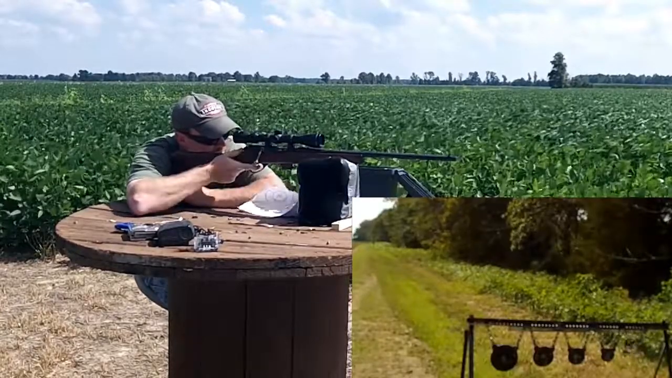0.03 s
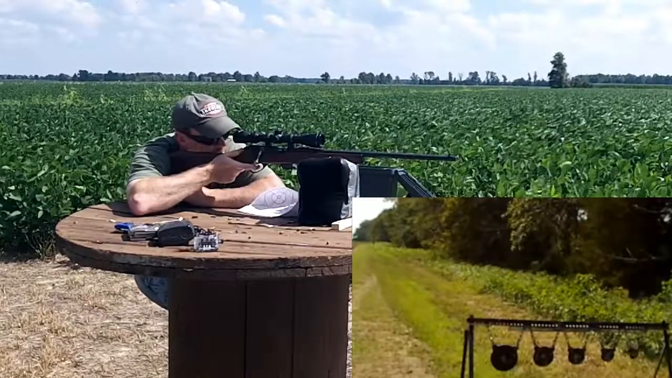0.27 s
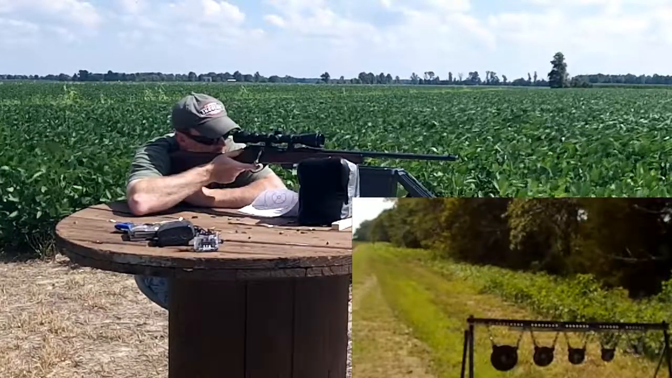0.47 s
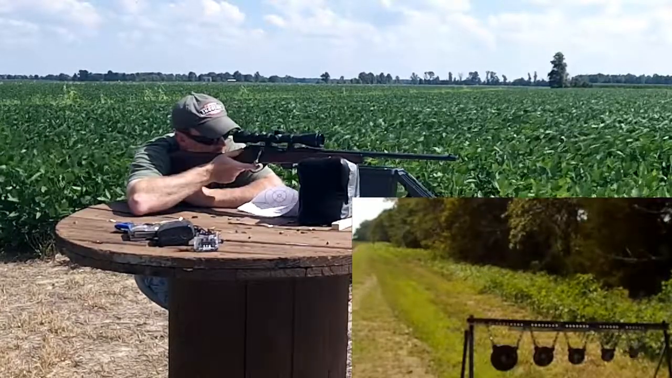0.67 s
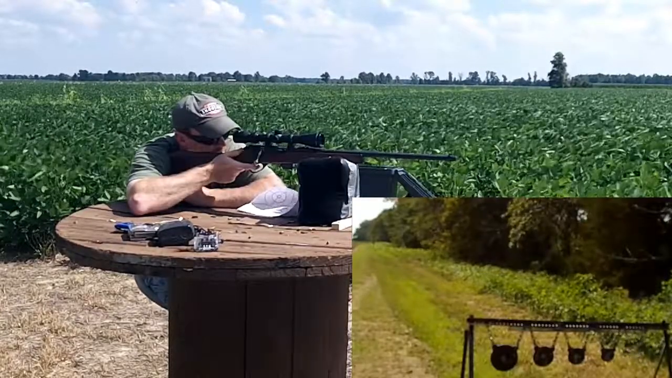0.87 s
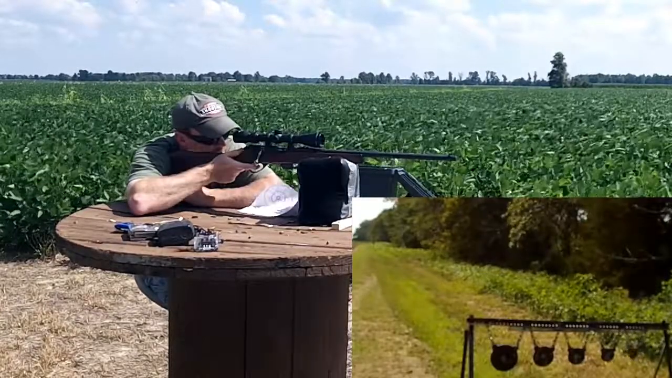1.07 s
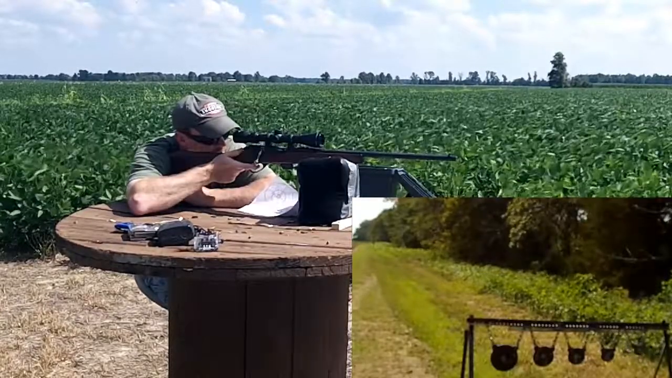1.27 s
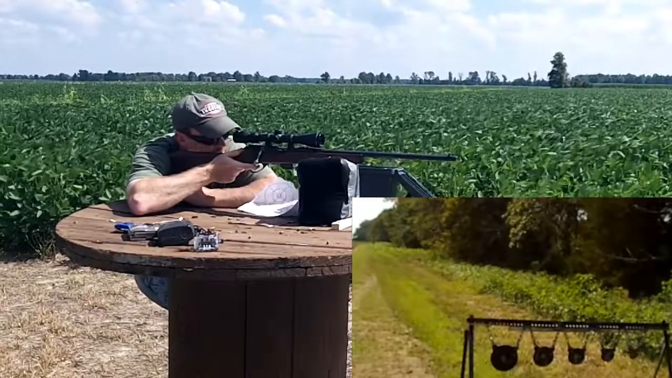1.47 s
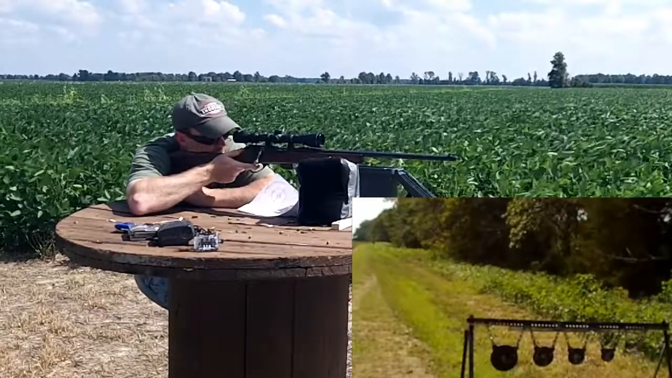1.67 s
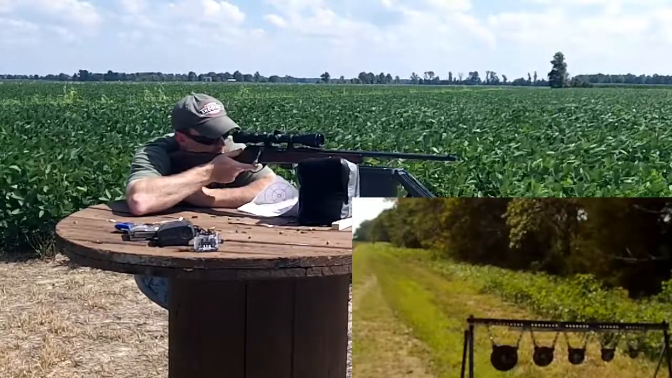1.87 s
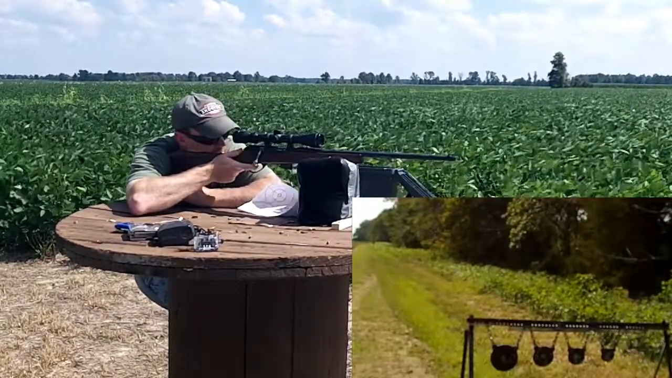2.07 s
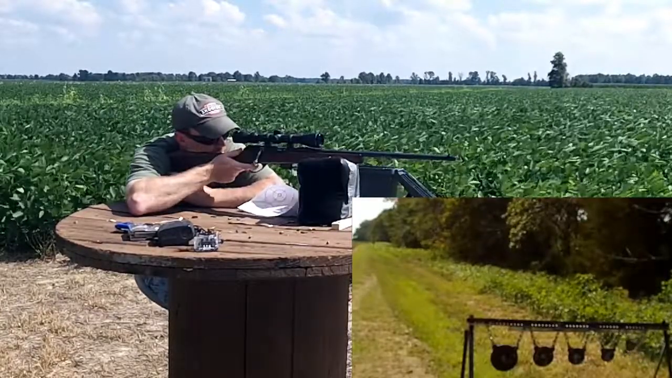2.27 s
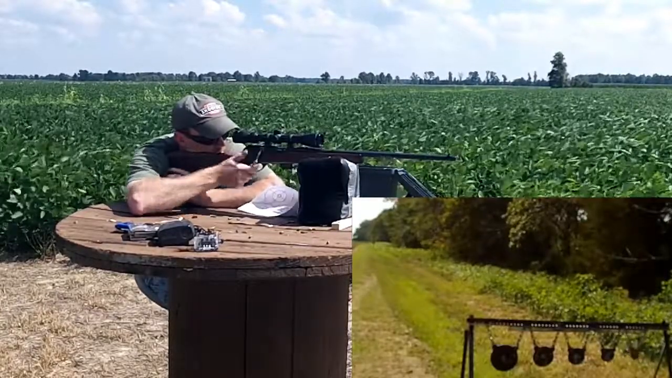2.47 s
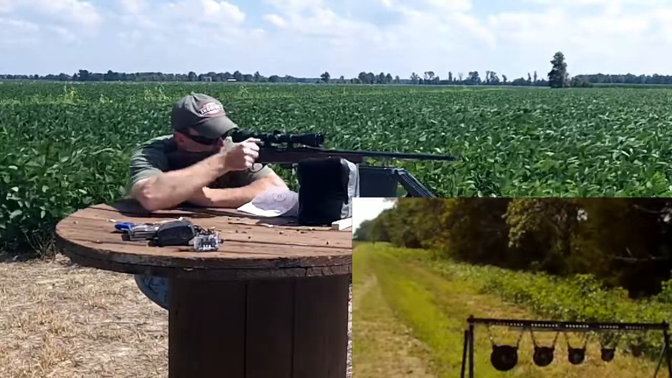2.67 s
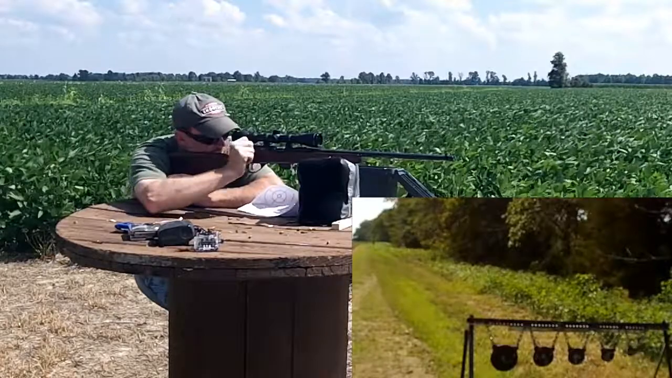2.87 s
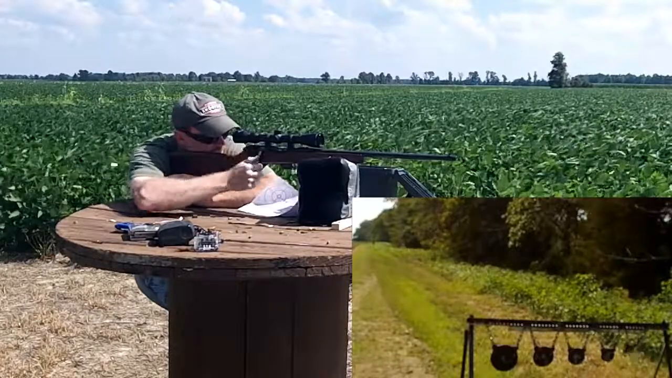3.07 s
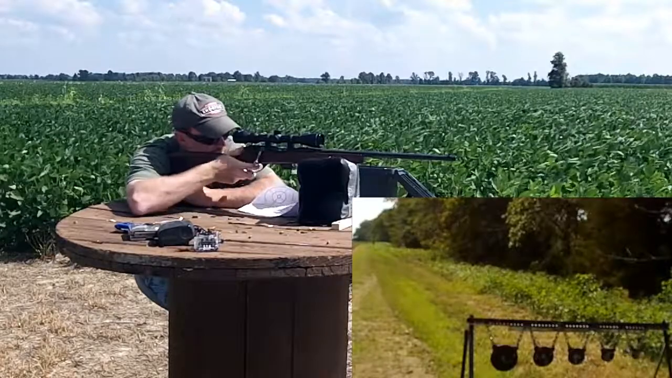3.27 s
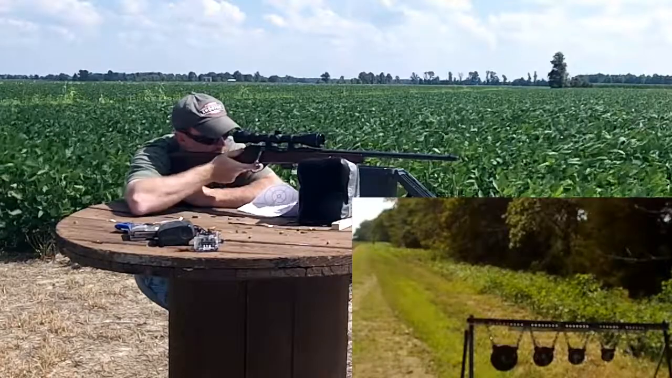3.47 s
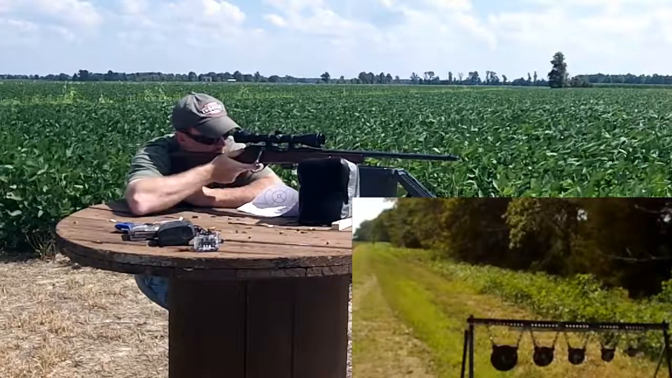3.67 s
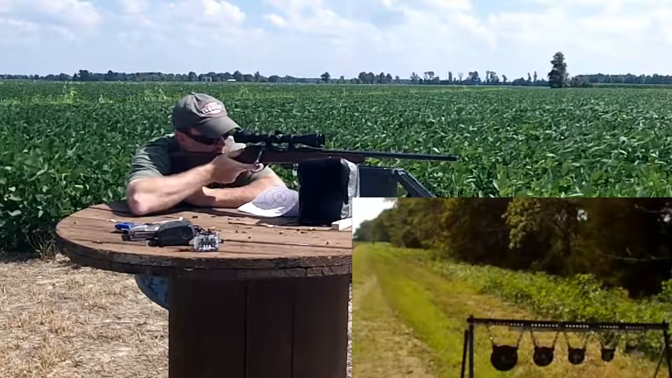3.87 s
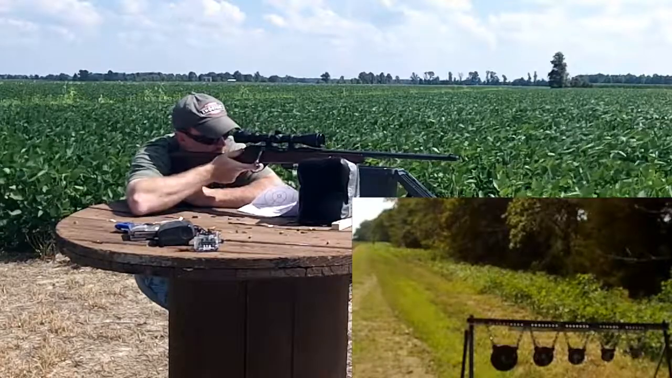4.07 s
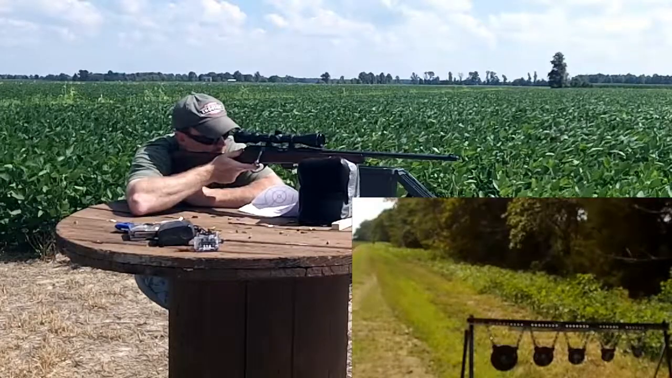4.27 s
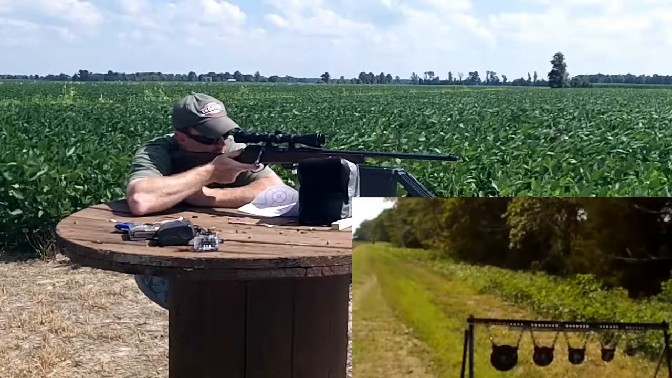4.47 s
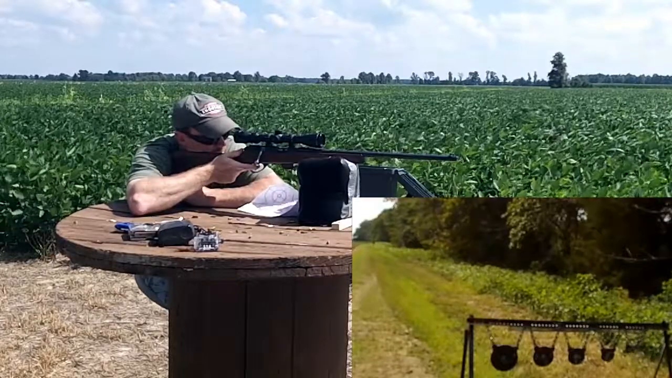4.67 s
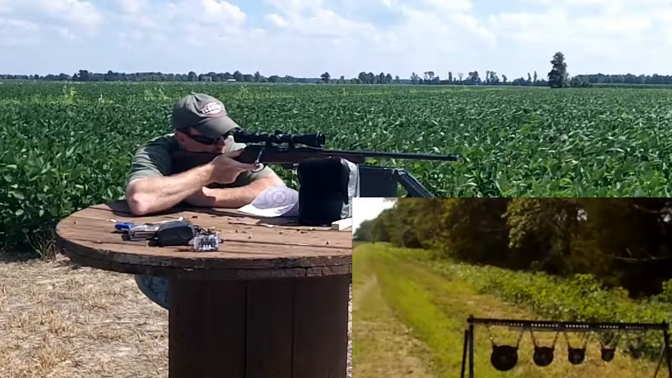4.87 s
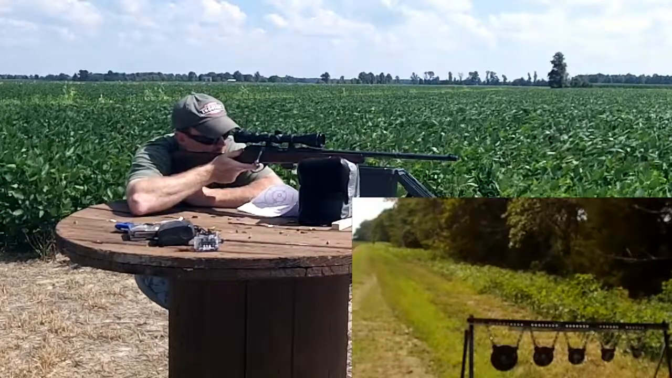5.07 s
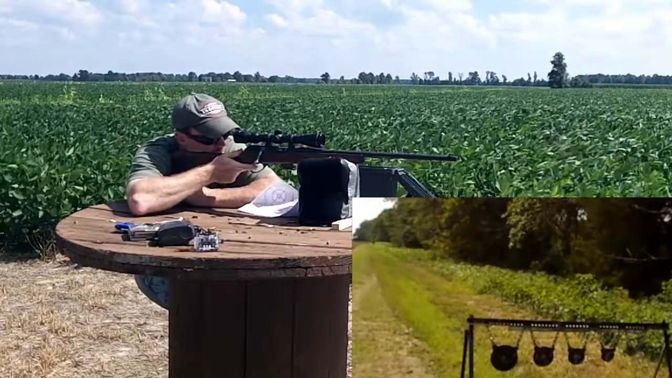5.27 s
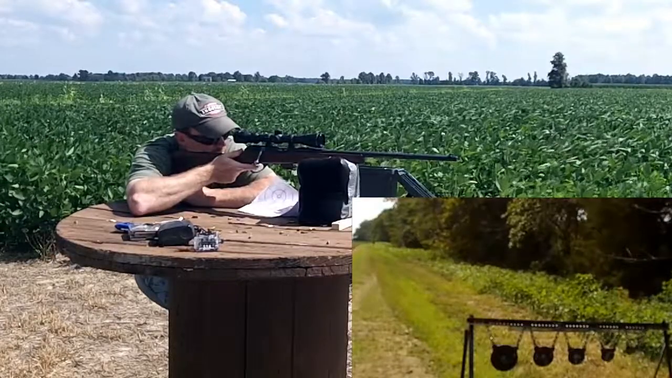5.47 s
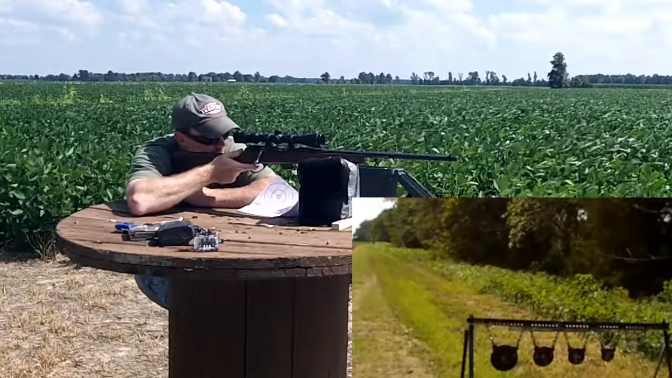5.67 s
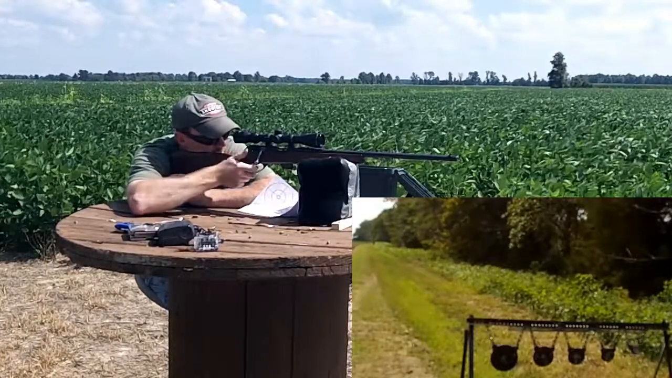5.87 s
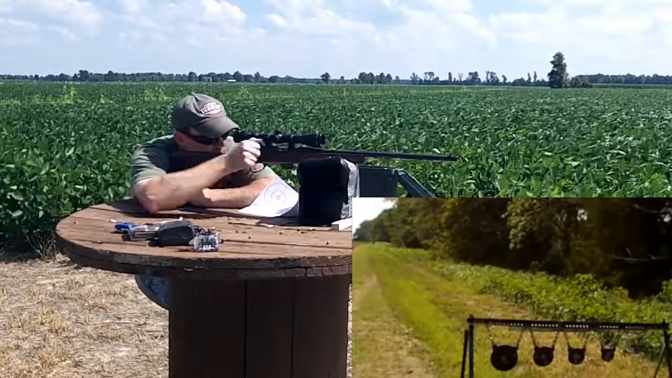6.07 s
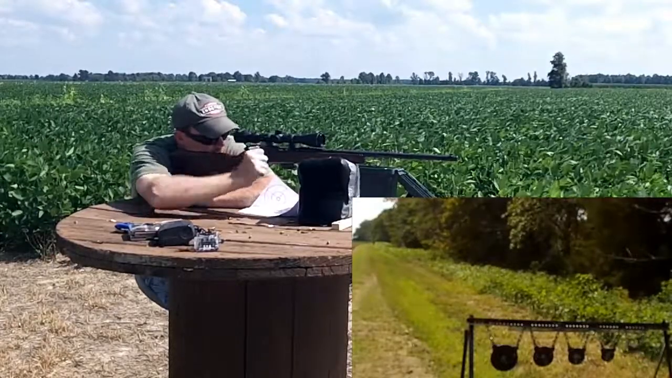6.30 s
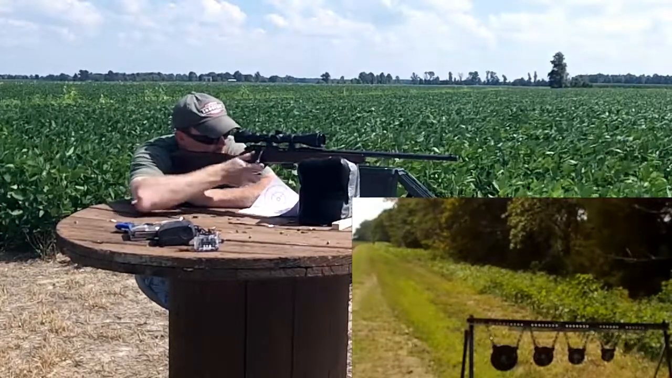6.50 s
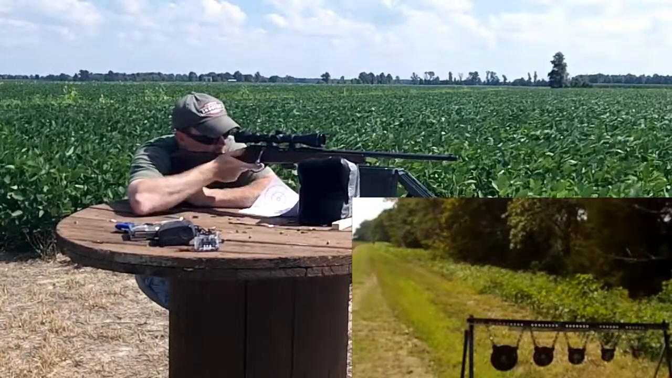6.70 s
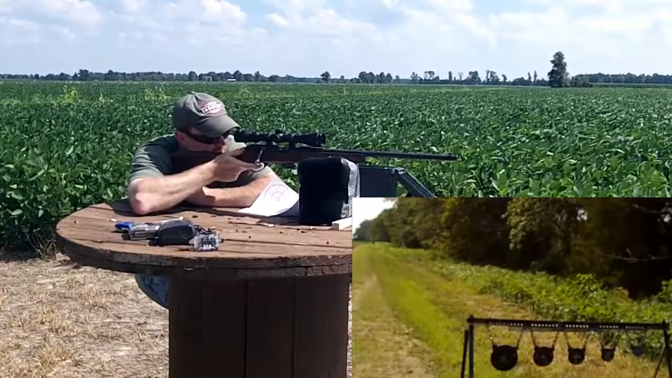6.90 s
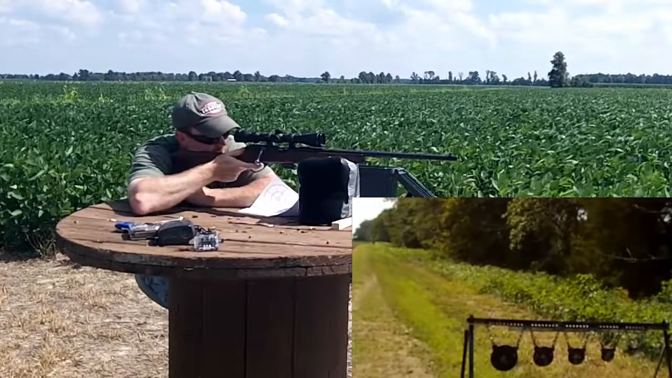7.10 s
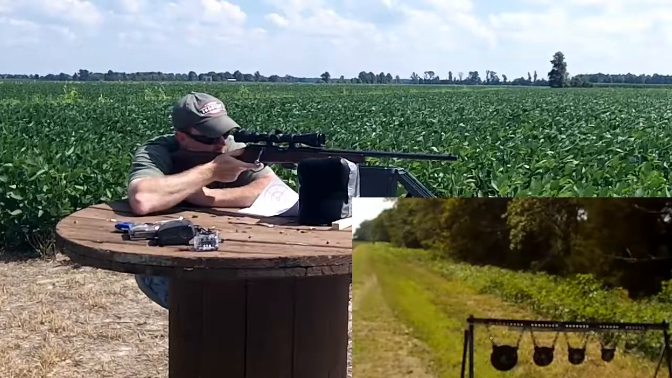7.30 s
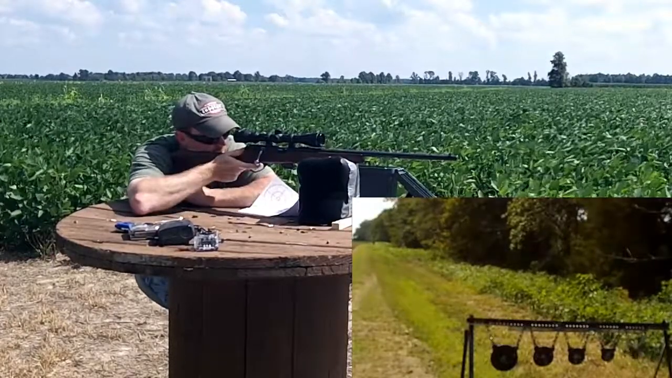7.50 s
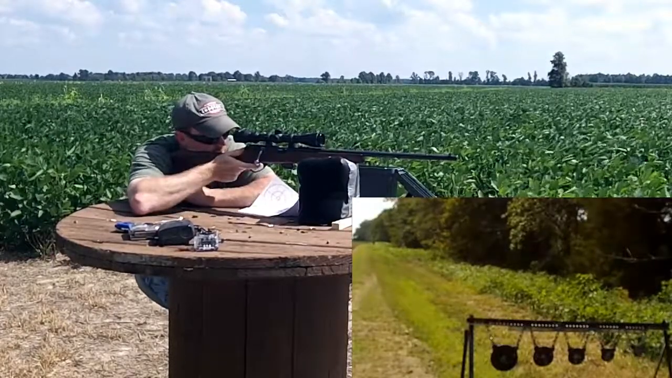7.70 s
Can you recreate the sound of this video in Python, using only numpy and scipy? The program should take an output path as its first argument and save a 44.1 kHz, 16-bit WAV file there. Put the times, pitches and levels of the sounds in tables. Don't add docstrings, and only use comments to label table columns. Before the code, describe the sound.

Two sharp rifle shots crack over open farmland, each echoing off trees and followed by loud metallic bolt clacks, with wind rumbling on the microphone.

```python
import sys
import numpy as np
from scipy import signal
from scipy.fft import rfft, irfft, next_fast_len
from scipy.io import wavfile
from scipy.ndimage import map_coordinates

SR = 44100
rng = np.random.default_rng(int(sys.argv[2]) if len(sys.argv) > 2 else 0)


def level_to_linear(level):
    exponent = np.asarray(level, float) / 20
    return 10 ** exponent


def inscribe(sig):
    pcm = np.round(np.clip(np.atleast_2d(sig).T, -1, 1) * 32767)
    wavfile.write(sys.argv[1], SR, pcm.astype(np.int16))


N = 341412
TIME = np.arange(N) / SR

# start in seconds, level in dB.
SHOTS = [
    (1.8393, -0.3),
    (5.3694, -1.3),
]
# delay in seconds, boom in dB, crack in dB, decay time t60 in seconds.
BLAST_ARRIVALS = [
    (0.0001, 1, -12.5, .02),
    (.0017, -1, -11.5, .012),
    (.0032, -0.5, 2, 0.012),
    (.027, -9, -32, .1),
    (.2468, -42, -6, .005),
]
# delay in seconds, boom of the first shot in dB,
# boom of the second shot in dB, crack in dB.
ECHOES = [(.0068, -5.5, -13.5, -16), (.0078, -10, -11, -24.5), (0.0102, -10, -7, -19),
          (.016, -14.5, -10, -25), (0.0231, -4, -3, -28), (.027, -10.5, -12, -31),
          (0.0299, -16.5, -5, -30.5), (0.0311, -5.5, -8, -34), (.035, 1, 1.5, -24.5),
          (.038, -1.5, -11, -25.5), (0.0407, -4.5, -6, -29), (0.043, -10.5, -10, -33.5),
          (0.05, -6, -8, -20.5), (0.055, -20, -18, -24.5), (0.0567, -24, -17, -26), (.065, -24, -29, -40),
          (.069, -7, -18, -23), (0.0778, -12, -21, -28), (0.083, -14, -12, -33), (0.097, -20, -27, -30),
          (0.1009, -10, -24, -19), (0.1185, -13, -11.5, -31), (.128, -16, -17, -28),
          (.136, -11.5, -28, -26), (0.141, -14, -26, -26), (0.146, -19, -30, -17), (.162, -17, -19, -27),
          (.192, -10.5, -10, -40), (0.199, -3.5, -7, -33), (0.214, -22, -24, -37), (.2265, -14, -12, -32),
          (.234, -32, -19, -29.5), (.245, -19.5, -16, -25), (.308, -31, -27, -29), (.319, -14, -22, -10),
          (0.3224, -7, -6.5, -12.5), (0.339, -19, -20, -23), (0.3424, -15.5, -20, -17),
          (0.4828, -28, -16.5, -29), (0.5005, -8, -6, -18), (.508, -16, -13, -35), (.523, -23, -27, -26),
          (0.62, -19.5, -17.5, -44), (.682, -24.5, -18, -48), (.732, -27, -30, -50)]
ECHO_T60_S = 0.007
# delay in seconds, boom in dB, crack in dB, decay time t60 in seconds.
TREE_SWELLS = [
    (.0033, -12, -19, .25),
    (.299, -28, -15, 0.33),
    (.46, -46.5, -16.5, 0.25),
    (.485, -15.5, -44, 0.23),
    (.672, -22.5, -48, 0.27),
    (.523, -40, -20, 0.11),
    (.31, -23, -23, 0.39),
]
# delay in seconds, boom in dB, crack in dB.
FIELD_SCATTER = [(.01, -53.5, -47), (.055, -25.5, -34.5), (.17, -30.5, -29.5), (.38, -38, -38),
                 (.57, -42, -35.5), (.67, -42, -45.5), (.76, -49, -52), (.85, -47, -61), (.91, -50, -58)]
# delay in seconds, start level in dB, decay time t60 in seconds.
SIZZLE_BURSTS = [
    (0.0002, -23, 0.023),
    (0.0048, -39.5, 0.14),
    (0.038, -36.5, 0.22),
    (0.0339, -24, 0.014),
]
# delay in seconds, peak in dB, decay time t60 in seconds.
PRESSURE_PUSHES = [
    (.0018, -13.5, 0.029),
    (.022, -33, 0.099),
    (.033, -27.5, .025),
]
# frequency in Hz, density in dB per Hz.
NEAR_BOOM_SPECTRUM = [(180, -54.5), (300, -31), (572, -24.5), (707, -16), (935, -12.5), (1060, -5),
                      (1210, 1.5), (1420, 4), (1900, -6.5), (2360, -19), (3000, -47.5), (3900, -80.5),
                      (6600, -120)]
FAR_BOOM_SPECTRUM = [(180, -43), (300, -15), (397, -15.5), (476, -8), (771, -1.5), (841, 3.5), (2550, -7),
                     (3000, -16.5), (3900, -38), (6600, -120)]
CRACK_SPECTRUM = [(290, -47), (500, -26), (1140, -8), (2530, -2.5), (3340, -4.5), (4300, -5.5),
                  (5290, -11.5), (6810, -22.5), (7880, -36.5), (9000, -30.5), (11700, -67), (19800, -120)]
LEAF_SPECTRUM = [(500, -41.5), (1140, -10), (2100, -1.5), (3100, -6.5), (4300, -2.5), (5400, -8),
                 (6900, -21.5), (7880, -35.5), (9000, -31.5), (11700, -66.5), (19800, -120)]
SIZZLE_SPECTRUM = [(4880, -43), (8300, -14.5), (9290, -4.5), (10700, -0.5), (11800, 2), (13000, -2),
                   (15100, -1), (16300, -21)]

# start in seconds, peak in dB,
# body in dB re peak, treble tilt in dB per octave, loudest ring in Hz.
FIRST_RELOAD = [(2.699, -21.5, -5, 7, 2770), (2.743, -16, -4, 1, 5000), (2.754, -5.5, -17, 10.5, 4800),
                (2.7616, -3.5, -10, 4, 4300), (2.8236, -26, -1.5, -7, 5000), (2.839, -26, 1, -3, 5000),
                (2.845, -23, -19, -1.5, 5000), (2.8498, -8, -25, 1.5, 4800), (2.8544, -9.5, -8, -1, 5000),
                (2.8589, -1.5, -12, 7.5, 5860), (2.8624, -20, -11, -5, 5130), (2.992, -12.5, -7, 4, 4870),
                (2.9999, -11, -19, 5, 5300), (3.0063, -4.5, -29, -5, 4300), (3.0197, -4.5, -37, -3, 4200),
                (3.0208, -7, -12, 0, 4760), (3.05, -27.5, -4, -3, 4600), (3.1, -9.5, -13.5, -9, 4460),
                (3.1, -5.5, -13, -2, 2770), (3.115, -33, -17, -3, 6300), (3.5361, -32.5, -10, 2, 4300)]
SECOND_RELOAD = [(6.0975, -27, 0, 7, 4500), (6.1001, -21.5, 4, 2, 4570), (6.143, -16.5, -9, -1, 4400),
                 (6.153, -6, -8, 1, 3200), (6.1637, -3.5, -8, 2, 4300), (6.2, -31, 2, -3, 5000),
                 (6.218, -24, 4, -3, 5000), (6.225, -16, -1, -1, 4750), (6.2302, -13, 0, 5, 4800),
                 (6.2345, -1.5, -16, 11, 3870), (6.331, -26.5, 1.5, -3, 4500), (6.344, -11, -9, 6, 4830),
                 (6.3517, -12, -15, 2, 4930), (6.3563, -7.5, -16, 2, 4400), (6.3645, -2, -12.5, 5, 4940),
                 (6.396, -23, -5, -16, 4700), (6.4537, -10, -6, 0, 4300)]
# start in seconds, peak in dB, body in dB re peak, decay time t60 in seconds,
# loudest ring in Hz.
REBOUNDS = [(2.6976, -21.5, 3.5, 0.015, 2800), (2.77, -31, -10, 0.065, 6300),
            (2.9947, -24, -7, 0.043, 4700), (3.01, -21, -9, 0.035, 5000), (3.025, -16, -9, 0.026, 4300),
            (6.229, -24, 9, 0.03, 4800), (6.3475, -15, -12, .05, 4800), (6.3677, -8, -20, 0.018, 5970),
            (6.916, -26.5, -27, 0.02, 4300), (6.9306, -37, 21, 0.0031, 4300), (6.897, -44, -9, .015, 4300)]
# frequency in Hz, width in Hz, level in dB.
STEEL_MODES = [(1990, 89, -11), (2750, 81, 2), (4300, 160, -7), (4930, 110, -4.5), (6000, 270, -4),
               (7050, 260, -1.5), (9070, 110, 3.5), (11500, 170, -4)]
# frequency in Hz, density in dB per Hz.
CLACK_SPECTRUM = [(880, -21.5), (1500, -7.5), (1870, -6.5), (2760, -2.5), (3400, -4.5), (4190, -1),
                  (5020, -1), (6130, -6.5), (7870, -19.5), (8870, -19.5), (11400, -25), (14300, -41.5),
                  (16300, -39.5)]
WOOD_SPECTRUM = [(150, -52), (400, -15), (1100, -10), (1800, 1.5), (2600, -10.5), (3800, -9.5), (6500, -67)]
CONTACT_T60_S, TREBLE_HZ = 0.015, 6260
LOUDEST_DB, LOUDEST_WIDTH_HZ = 4.5, 250

# centre in seconds, rumble in dB, flutter in dB re rumble, half length in seconds.
PUFFS = [(0.104, -36, -8, 0.075), (0.216, -37, -36, 0.21), (0.446, -33.5, -2, 0.078),
         (0.59, -35, -14, 0.056), (0.715, -33, -10.5, 0.049), (0.894, -30.5, -10.5, 0.081),
         (1.117, -29.5, -11.5, 0.094), (1.446, -35.5, -22, 0.051), (1.727, -37.5, -22, 0.073),
         (2.567, -40.5, -15, 0.034), (2.74, -36, -4.5, 0.082), (2.972, -35, -35, 0.048),
         (3.114, -57, 9.5, 0.03), (3.3, -35.5, -26, 0.081), (3.554, -36.5, -11, 0.046),
         (3.693, -33.5, -27, 0.043), (3.868, -36, -10, 0.081), (4.114, -40, -12, 0.14),
         (4.46, -45, -30, 0.099), (4.751, -39.5, -24, 0.11), (5.143, -38, -28, 0.12),
         (5.331, -35.5, -4.5, 0.049), (5.718, -28.5, -10.5, 0.098), (5.986, -28.5, -14, 0.031),
         (6.197, -28, 1, 0.16), (6.424, -17, -5, 0.024), (6.462, -29.5, 1.5, 0.092), (7.09, -38, 4, 0.11),
         (7.446, -37.5, -10.5, 0.047), (7.582, -36.5, -5, 0.021)]
LULL_DB, FLUTTER_DB = -50.5, -1.5
NARROWER = 1.7
SQUALL_S, SQUALL_HOLD_S, RISE_DB_PER_S, FALL_DB_PER_S = 6.6, 0.38, 600, 189
SQUALL_RUMBLE_DB, SQUALL_SWELL_DB, SQUALL_FLUTTER_DB = -28.5, 5, -21.5
# start in seconds, peak in dB, decay time t60 in seconds.
EDDY_POPS = [(6.214, -11.5, 0.055), (6.2, -15, .015), (6.407, -18, .01), (6.413, -11, 0.016),
             (6.434, -12.5, 0.025), (6.442, -13, 0.028), (6.548, -22, 0.025), (6.581, -27, .02),
             (6.604, -8.5, 0.037), (6.613, -11, 0.028), (6.625, -13, .03), (6.641, -14.5, .02),
             (6.69, -15, 0.013), (6.724, -17.5, 0.023), (6.754, -14, 0.015), (6.765, -12, 0.011),
             (6.78, -13, 0.027), (6.831, -15, 0.017), (6.844, -14.5, 0.017), (6.928, -5, 0.022),
             (6.955, -12, .02), (6.962, -5.5, 0.028), (6.984, -22, 0.016), (7.012, -21.5, 0.032)]
# start in seconds, peak in dB, brightness in dB.
EDDY_THUMPS = [(0.075, -29, -7), (0.104, -31.5, -1.5), (0.37, -23, -11), (0.442, -17, 7),
               (0.586, -29.5, -9), (0.707, -25.5, 5), (0.899, -24, -4), (1.044, -22, -9), (1.124, -22, -6),
               (1.155, -23, 9), (1.227, -33, -5), (1.715, -29, -9), (2.74, -29, 8), (3.247, -28, -13),
               (3.67, -35, -8), (3.819, -30, -5), (4.115, -25.5, -6), (4.68, -34, -10), (4.735, -51, -6),
               (5.034, -23, -23), (5.145, -26.5, -3), (5.312, -25, -4), (5.729, -16, -9), (6.117, -12, -20),
               (7.098, -35, -1.5), (7.118, -18, 13), (7.571, -28, -6)]
EDDY_T60_S, EDDY_DB = 0.034, -4
# frequency in Hz, density in dB per Hz.
RUMBLE_SPECTRUM = [(12, -35), (20, 6.5), (54, 3.5), (119, 0), (282, -16), (347, -26.5), (450, -30),
                   (580, -50), (990, -120)]
ROAR_SPECTRUM = [(59, -27), (100, -7.5), (275, -2), (329, -1.5), (399, -1), (623, -8.5), (681, -11),
                 (891, -15.5), (3500, -65.5), (4550, -88), (7700, -120)]
BREEZE_SPECTRUM = [(88, -28), (150, 1), (297, -2.5), (487, -12), (583, -14.5), (900, -32.5), (1170, -63),
                   (1980, -120)]

# centre in seconds, level in dB.
PEEPS = [(.175, -53), (.395, -52), (.67, -54), (.845, -52), (1.162, -51.5), (1.347, -53.5), (1.67, -54),
         (4.903, -52), (5.175, -52), (7.15, -54), (7.212, -53), (7.5, -52), (7.67, -53)]
# start in seconds, end in seconds, first pitch in Hz, last pitch in Hz, level in dB.
WHISTLES = [
    (0.223, 0.39, 3390, 3420, -55),
    (2.402, 2.471, 2750, 3120, -45),
    (4.81, 4.89, 4100, 4040, -61),
    (4.9, 5.0, 3500, 3470, -61),
    (5.03, 5.212, 3440, 3800, -61),
    (5.195, 5.38, 3890, 4240, -58),
]

# frequency in Hz, density in dB per Hz.
HISS_SPECTRUM = [(180, -38), (300, -8), (448, -5), (479, -10), (539, -4.5), (906, -8.5), (1270, -6.5),
                 (1380, -9), (1830, -8.5), (2560, -11.5), (4440, -10), (7720, -23), (9920, -21.5),
                 (14600, -20), (16400, -30)]
HISS_DB = -53.5
# frequency in Hz, width in Hz, level in dB.
TREBLE_NOTCHES = [(7860, 570, -11.5), (12200, 300, -3)]
TOP_HZ = 16170


def shots():
    return arrivals() + tree_swells() + field_scatter() + treble_sizzle() + pressure_push()


def arrivals():
    first = BLAST_ARRIVALS + [(delay, one, crack_db, ECHO_T60_S) for delay, one, two, crack_db in ECHOES]
    second = BLAST_ARRIVALS + [(delay, two, crack_db, ECHO_T60_S) for delay, one, two, crack_db in ECHOES]
    return returns(after_shots(first, second), rise=0.0005, size=2048, crack=CRACK_SPECTRUM)


def tree_swells():
    return level_to_linear(-0.5) * returns(after_shots(TREE_SWELLS), rise=0.0053, size=16384, crack=LEAF_SPECTRUM)


def field_scatter():
    since = since_shot()
    far = age(since)
    boom = np.sqrt(1 - far) * noise(NEAR_BOOM_SPECTRUM) + np.sqrt(far) * noise(FAR_BOOM_SPECTRUM)
    boom = unit(level_to_linear(1.3 * wobble(140)) * boom)
    crack = unit(level_to_linear(1.1 * wobble(130) + 0.9 * wobble(25)) * noise(CRACK_SPECTRUM))
    delay, boom_db, crack_db = np.transpose(FIELD_SCATTER)
    boom = boom * level_to_linear(np.interp(since, delay, boom_db, -120, -120))
    return boom + crack * level_to_linear(np.interp(since, delay, crack_db, -120, -120))


def treble_sizzle():
    since = since_shot()
    sizzle = unit(level_to_linear(1.5 * wobble(200)) * noise(SIZZLE_SPECTRUM))
    out = np.zeros(N)
    for delay, db, t60 in SIZZLE_BURSTS:
        fall_db = 60 * (abs(since - delay) / t60) ** 1.2
        out += (since > delay) * level_to_linear(db - fall_db) * sizzle
    return out


def pressure_push():
    s, shot_db, delay, db, t60 = after_shots(PRESSURE_PUSHES)

    def colour(hz):
        return along(RUMBLE_SPECTRUM, hz) + 0.36 * along(BREEZE_SPECTRUM, hz)

    return bursts(s, db + shot_db, t60, colour, rise=0.0008)


def returns(rows, rise, size, crack):
    s, shot_db, delay, boom_db, crack_db, t60 = rows
    near_db = shot_db + boom_db + 0.5 + 10 * np.log10(1 - age(delay))
    far_db = shot_db + boom_db - 2.0 + 10 * np.log10(age(delay))
    near = bursts(s, near_db, t60, lambda hz: along(NEAR_BOOM_SPECTRUM, hz), rise, size)
    far = bursts(s, far_db, t60, lambda hz: along(FAR_BOOM_SPECTRUM, hz), rise, size)
    return near + far + bursts(s, shot_db + crack_db + 3.0, t60, lambda hz: along(crack, hz), rise, size)


def after_shots(*tables):
    rows = np.broadcast_to(tables, (len(SHOTS),) + np.shape(tables[0]))
    columns = []
    for (s, db), table in zip(SHOTS, rows):
        columns.append(np.c_[s + table[:, 0], np.full(len(table), db), table].T)
    return np.concatenate(columns, axis=1)


def since_shot():
    return np.min([np.where(TIME > s, TIME - s, 9) for s, db in SHOTS], axis=0)


def age(since):
    return np.clip((since - 0.25) / 0.4, 1e-4, 1 - 1e-4)


def bolt():
    firm = [(*row[:4], CONTACT_T60_S, row[4]) for row in FIRST_RELOAD + SECOND_RELOAD]
    loose = [(*row[:3], 0, *row[3:]) for row in REBOUNDS]
    s, db, body_db, tilt_db, t60, loudest_hz = np.transpose(firm + loose)
    chance = rng.standard_normal((len(s), len(STEEL_MODES), 2))
    centre, width, level_db = np.transpose(STEEL_MODES)
    centre = centre * (1 + 0.015 * chance[..., 0])
    strength = level_to_linear(level_db + 2.7 * chance[..., 1])

    def steel(hz):
        ring = level_to_linear(LOUDEST_DB) * resonance(hz, loudest_hz, LOUDEST_WIDTH_HZ)
        for k, mode_width in enumerate(width + 30):
            ring = ring + strength[:, k, None] * resonance(hz, centre[:, k], mode_width)
        treble = level_to_linear(tilt_db[:, None] * np.log2(np.maximum(hz / TREBLE_HZ, 1)))
        return along(CLACK_SPECTRUM, hz) * treble * (0.84 + 1.3 * ring)

    clack = bursts(s, db - 0.7, t60, steel, rise=0.0014, size=2048)
    wash = bursts(s, db - 35.0, np.full(len(s), 0.4), lambda hz: along(CLACK_SPECTRUM, hz), rise=0.0047, size=8192)
    stock = bursts(s, db + body_db + 1.0, 1.62 * t60, lambda hz: along(WOOD_SPECTRUM, hz), rise=0.0012, size=2048)
    return clack + wash + stock


def resonance(hz, centre, width):
    return hz * width / np.hypot(centre[:, None] ** 2 - hz * hz, hz * width)


def wind():
    rumble_db, flutter_db = gusting()
    strong = np.clip((flutter_db + 34.0) / 14, 0, 1)
    lumps = wobble(22)
    rumble = unit(level_to_linear(2.3 * lumps + 0.97 * wobble(14)) * noise(RUMBLE_SPECTRUM))
    weak = unit(level_to_linear(2.8 * lumps + 6.4 * wobble(60)) * noise(BREEZE_SPECTRUM))
    roar = unit(level_to_linear(0.4 * lumps + 2.4 * wobble(170)) * noise(ROAR_SPECTRUM))
    flutter = np.sqrt(1 - strong) * weak + np.sqrt(strong) * roar
    return level_to_linear(rumble_db) * rumble + level_to_linear(flutter_db - 1.0) * flutter + eddies()


def gusting():
    step = TIME[::64, None]
    s, db, flutter_db, half = np.transpose(PUFFS)
    away_db = 6 * ((step - s) / half) ** 2
    t = step[:, 0] - SQUALL_S
    edge_db = np.minimum(0, np.minimum(RISE_DB_PER_S * t, FALL_DB_PER_S * (SQUALL_HOLD_S - t)))
    swell_db = SQUALL_SWELL_DB * np.clip(t / SQUALL_HOLD_S, 0, 1)
    rumble = level_to_linear(2 * (db - away_db)).sum(axis=1)
    rumble += level_to_linear(2 * (SQUALL_RUMBLE_DB + swell_db + edge_db)) + level_to_linear(2 * LULL_DB)
    flutter = level_to_linear(2 * (db + flutter_db + FLUTTER_DB - NARROWER * away_db)).sum(axis=1)
    flutter += level_to_linear(2 * (SQUALL_FLUTTER_DB + edge_db)) + level_to_linear(2 * LULL_DB - 39.5)
    return [np.interp(TIME, step[:, 0], 10 * np.log10(power)) for power in (rumble, flutter)]


def eddies():
    at, db, t60 = np.transpose(EDDY_POPS)
    pops = bursts(at, db - 2.0, t60, lambda hz: along(ROAR_SPECTRUM, hz) * (1 + (hz / 800) ** 1.62), rise=0.0005)
    at, db, bright_db = np.transpose(EDDY_THUMPS)

    def soft(hz):
        return level_to_linear(bright_db)[:, None] * along(BREEZE_SPECTRUM, hz) + 1.06 * along(RUMBLE_SPECTRUM, hz)

    return pops + bursts(at, db + EDDY_DB, np.full(len(at), EDDY_T60_S), soft, rise=0.0028)


def birds():
    out = np.zeros(N)
    for s, db in PEEPS:
        t = TIME - s
        phase = 2 * np.pi * (1375 * t - 600 * t * t)
        out += level_to_linear(db) * np.exp(-(t / 0.012) ** 2) * np.sin(phase)
    waver, fading = wobble(30), wobble(24)
    for start, end, from_hz, to_hz, db in WHISTLES:
        u = np.clip((TIME - start) / (end - start), 0, 1)
        hz = from_hz + (to_hz - from_hz) * u + 22 * waver
        swell = abs(np.sin(np.pi * u)) ** 0.33 * (u < 1)
        out += level_to_linear(db + 1.5 * fading) * swell * np.sin(2 * np.pi * np.cumsum(hz) / SR)
    return out


def hiss():
    return level_to_linear(HISS_DB + 0.3 * wobble(6)) * noise(HISS_SPECTRUM)


def unit(x):
    return x / np.sqrt(np.mean(x ** 2) + 1e-20)


def along(points, hz):
    f, db = np.transpose(points)
    return level_to_linear(np.interp(np.log(hz + 1), np.log(f + 1), db))


def wobble(rate):
    return map_coordinates(rng.standard_normal(int(N * rate / SR) + 4), [TIME * rate])


def noise(spectrum):
    m = next_fast_len(N)
    white = rfft(rng.standard_normal(m))
    return unit(irfft(white * along(spectrum, np.fft.rfftfreq(m, 1 / SR)), m)[:N])


def causal(gain):
    cepstrum = irfft(np.log(gain + 1e-5))
    fold = 2.0 * (np.arange(cepstrum.shape[-1]) < cepstrum.shape[-1] // 2)
    fold[0] = 1
    return np.exp(rfft(cepstrum * fold))


def bursts(times, peak_db, t60, gain, rise, size=4096):
    t = np.arange(size) / SR
    decay = level_to_linear(-60 * t / np.clip(t60, 0.002, 0.6)[:, None])
    shape = decay * (1 - np.exp(-(t + 1 / SR) / rise))
    colour = causal(gain(np.fft.rfftfreq(2 * size, 1 / SR)))
    rows = irfft(rfft(shape * rng.standard_normal(shape.shape), 2 * size) * colour)[:, :size]
    rows = rows * (level_to_linear(peak_db) / np.abs(rows).max(axis=1))[:, None]
    at = np.round(times * SR).astype(int)[:, None] + np.arange(size)
    return np.bincount(at.ravel(), rows.ravel(), N + size)[:N]


def scene():
    return (shots() + bolt() + wind() + birds())[None]


def low_pass(x):
    return signal.sosfilt(signal.butter(12, 16450, fs=SR, output="sos"), x)


def record(dry):
    x = dry + hiss()
    m = next_fast_len(N + 4096)
    hz = np.fft.rfftfreq(m, 1 / SR)
    notch_db = sum(db * np.exp(-((hz - centre) / width) ** 2) for centre, width, db in TREBLE_NOTCHES)
    shaping = level_to_linear(notch_db) / (1 + (hz / TOP_HZ) ** 90)
    x = irfft(rfft(x, m) * shaping, m)[:, :N]
    x = x / (1 + abs(x / 0.99) ** 8) ** (1 / 8)
    return low_pass(x)


dry = scene()
out = record(dry)
inscribe(out)
```